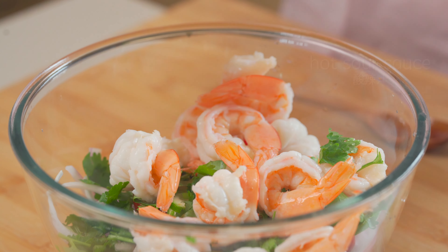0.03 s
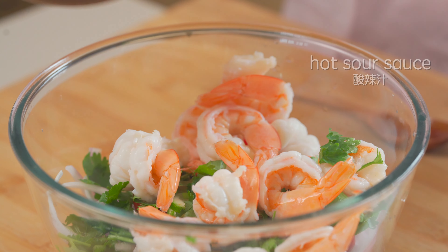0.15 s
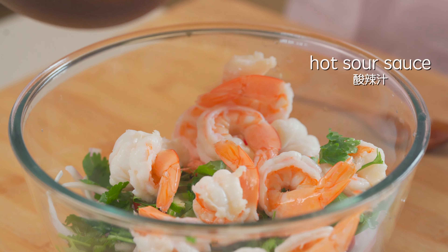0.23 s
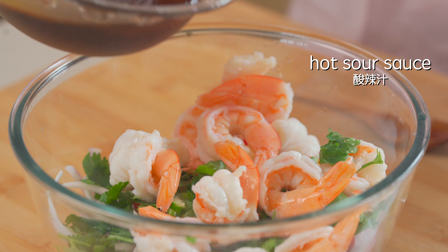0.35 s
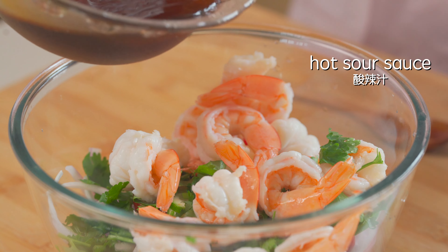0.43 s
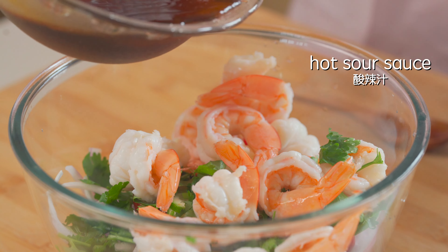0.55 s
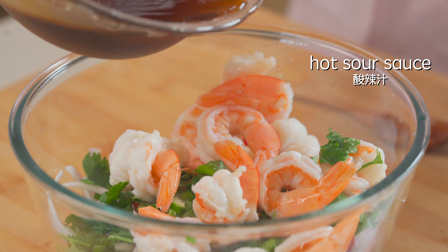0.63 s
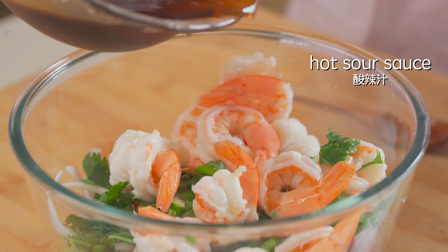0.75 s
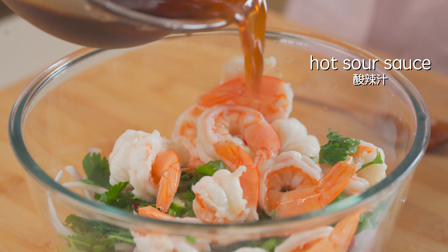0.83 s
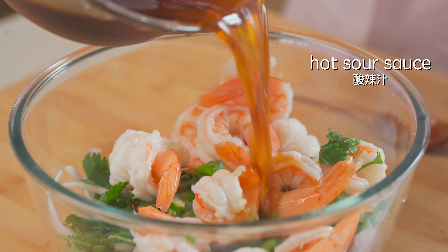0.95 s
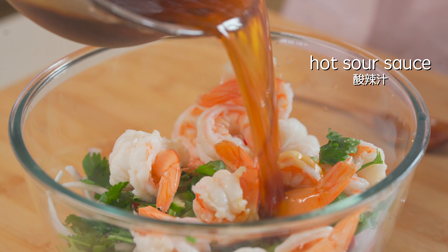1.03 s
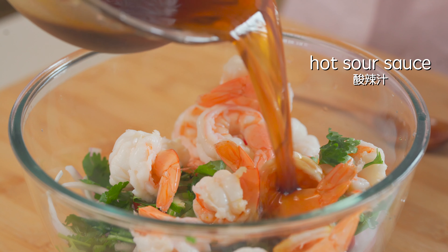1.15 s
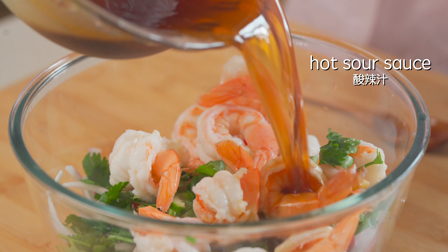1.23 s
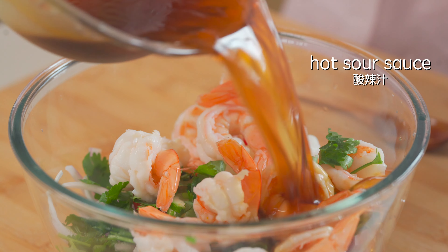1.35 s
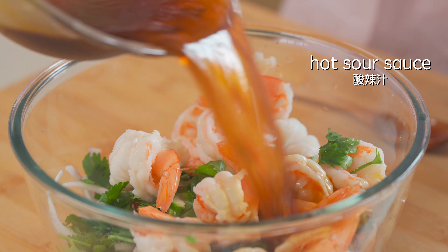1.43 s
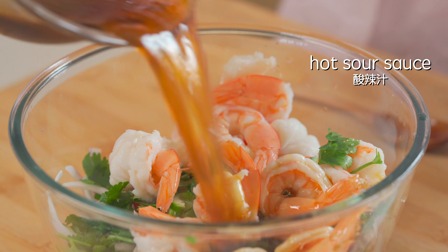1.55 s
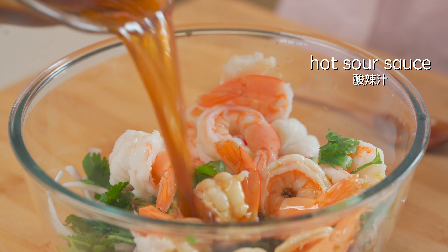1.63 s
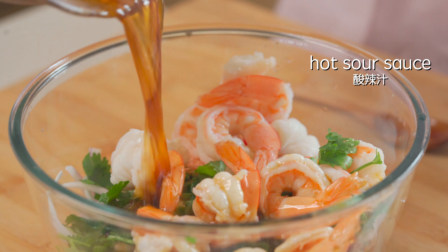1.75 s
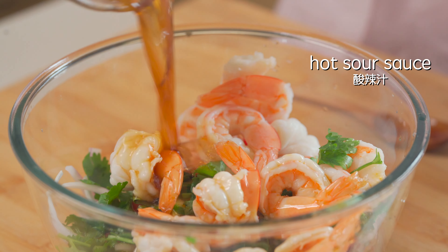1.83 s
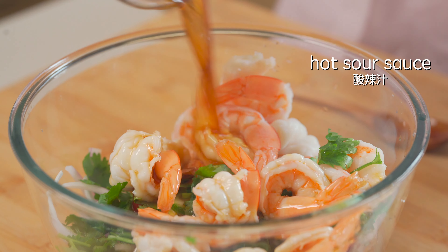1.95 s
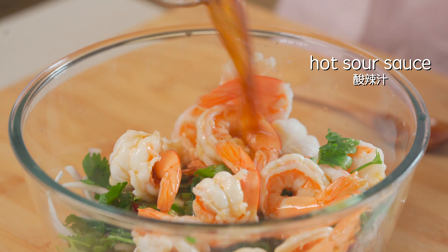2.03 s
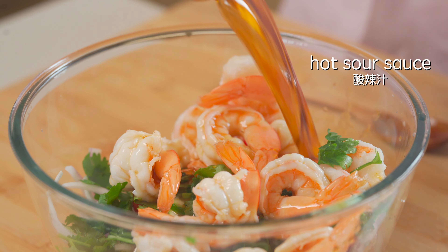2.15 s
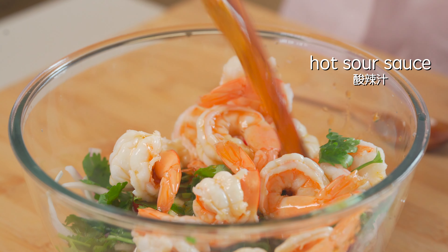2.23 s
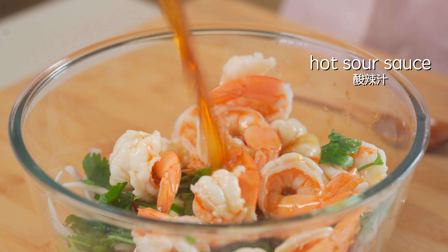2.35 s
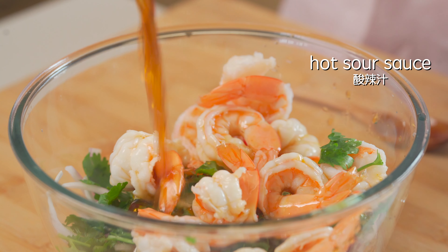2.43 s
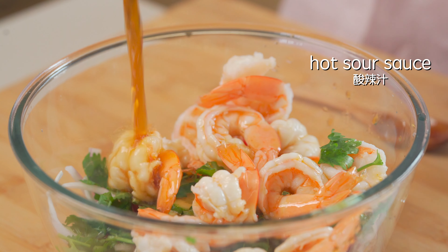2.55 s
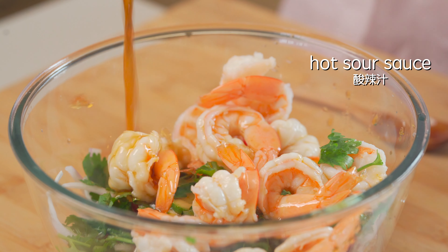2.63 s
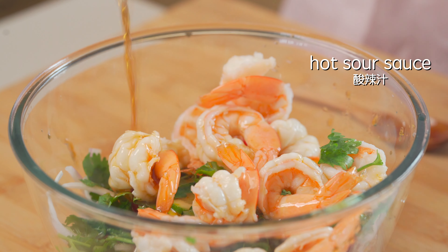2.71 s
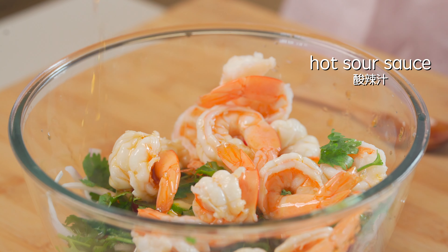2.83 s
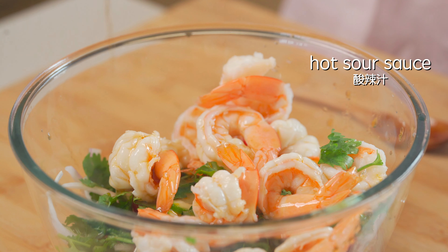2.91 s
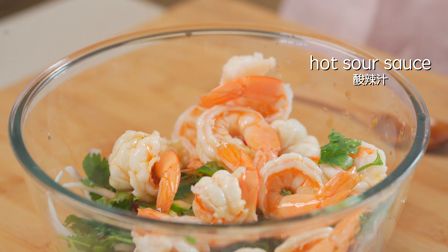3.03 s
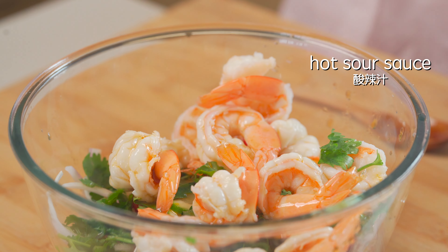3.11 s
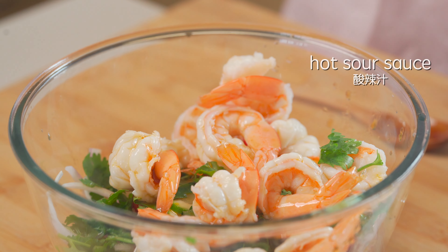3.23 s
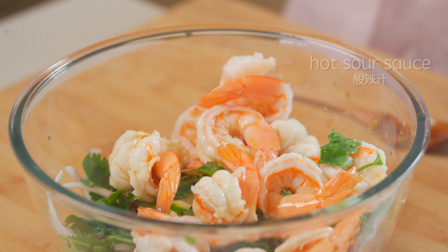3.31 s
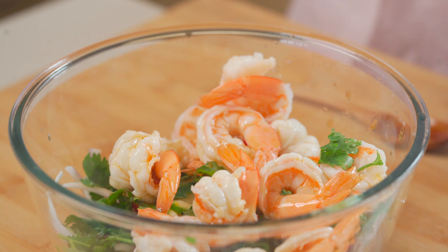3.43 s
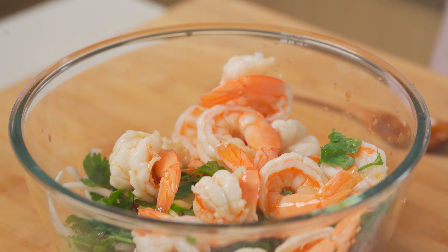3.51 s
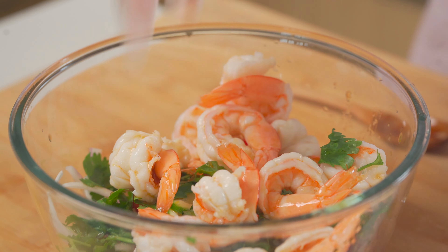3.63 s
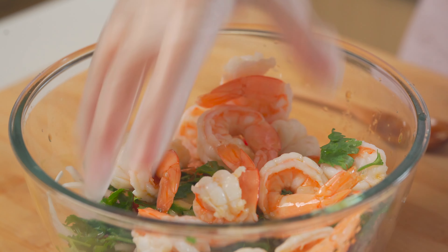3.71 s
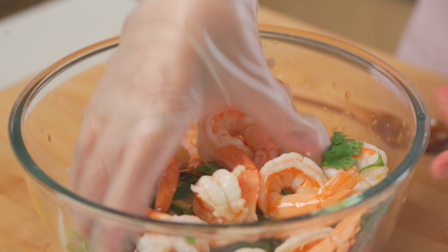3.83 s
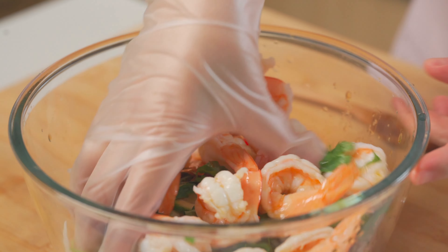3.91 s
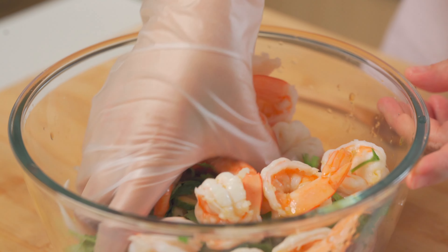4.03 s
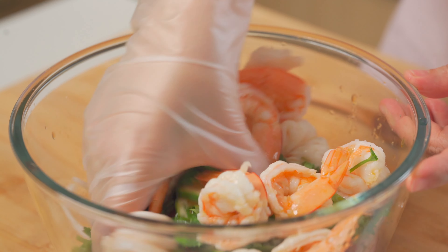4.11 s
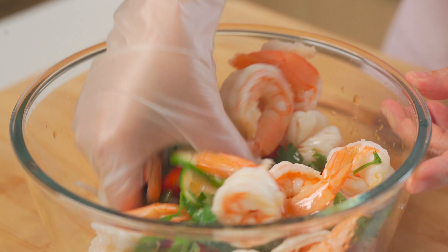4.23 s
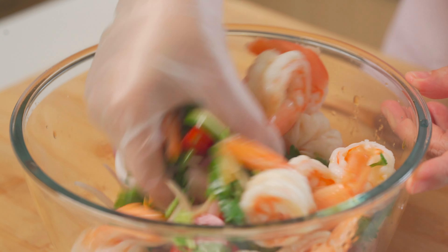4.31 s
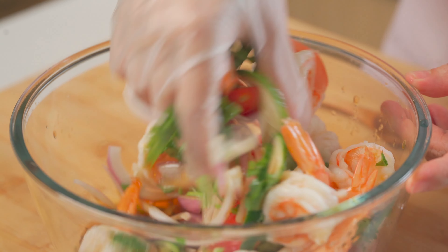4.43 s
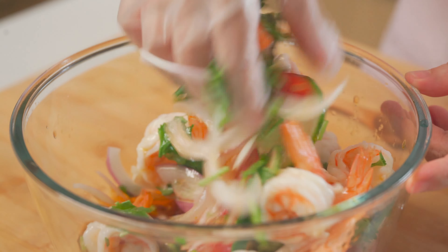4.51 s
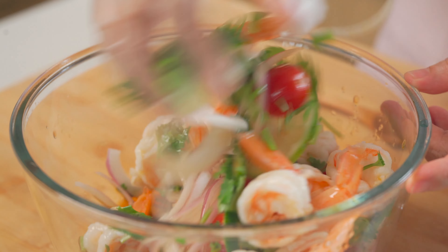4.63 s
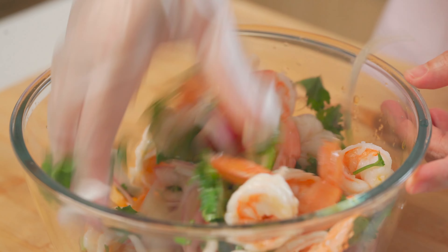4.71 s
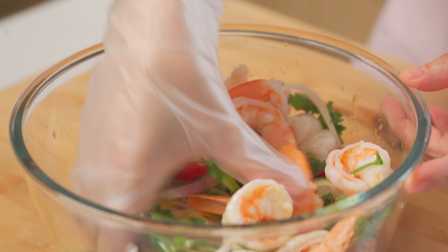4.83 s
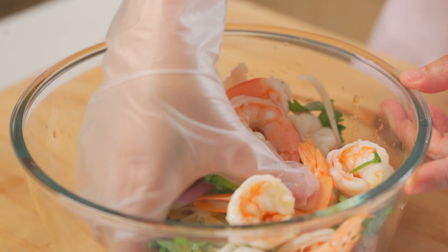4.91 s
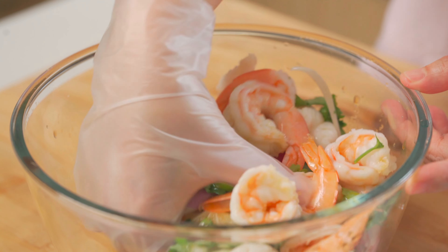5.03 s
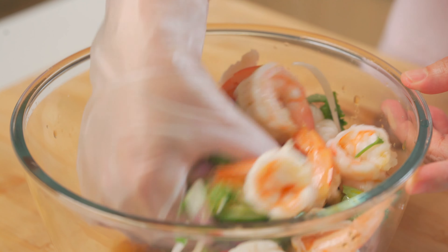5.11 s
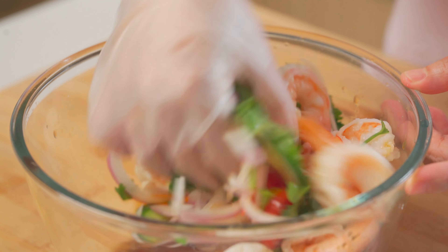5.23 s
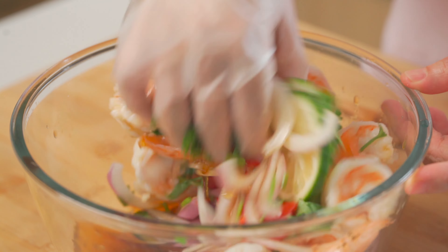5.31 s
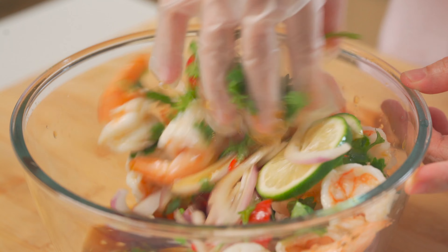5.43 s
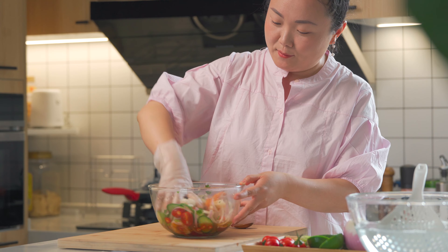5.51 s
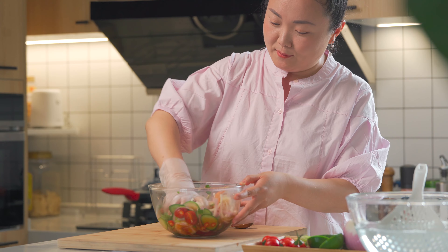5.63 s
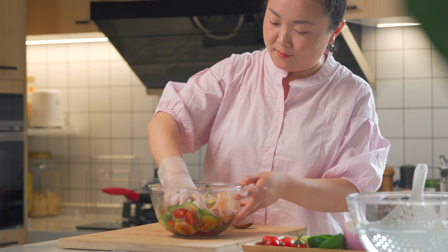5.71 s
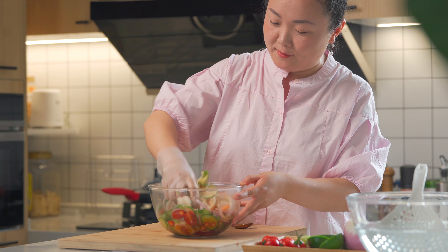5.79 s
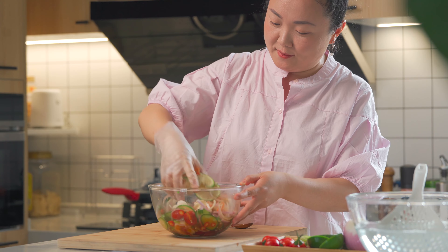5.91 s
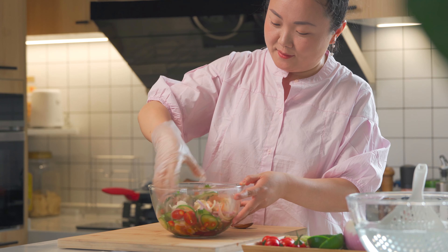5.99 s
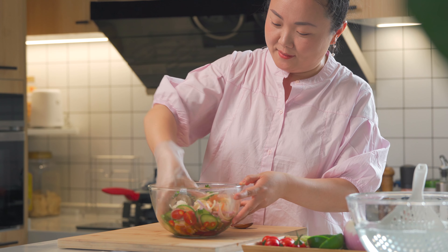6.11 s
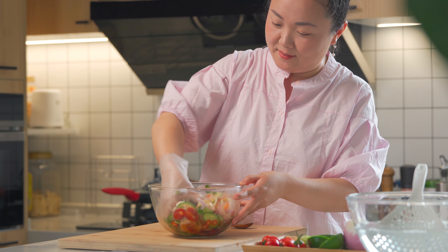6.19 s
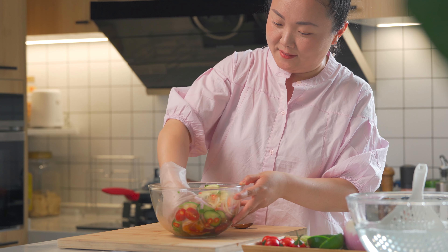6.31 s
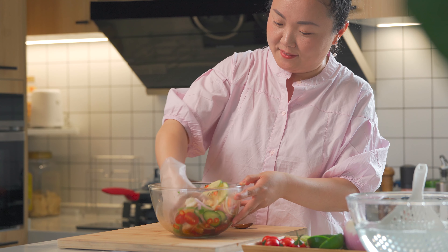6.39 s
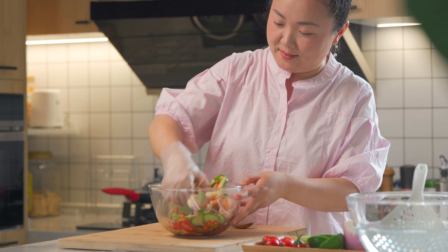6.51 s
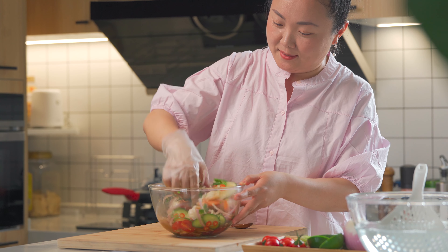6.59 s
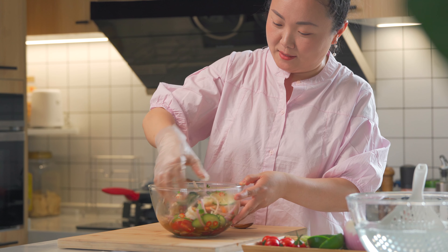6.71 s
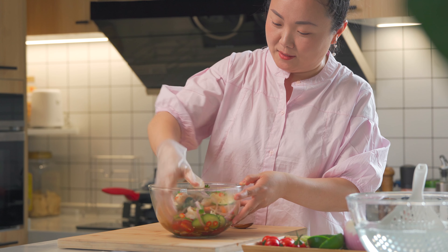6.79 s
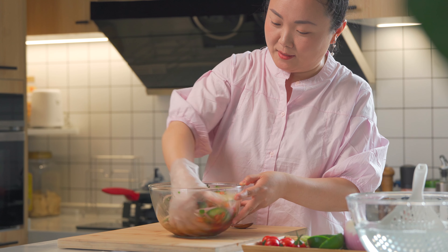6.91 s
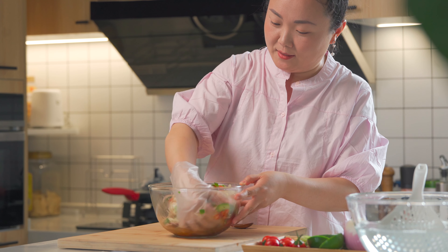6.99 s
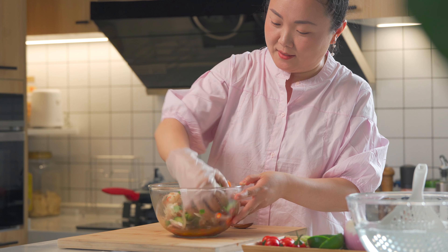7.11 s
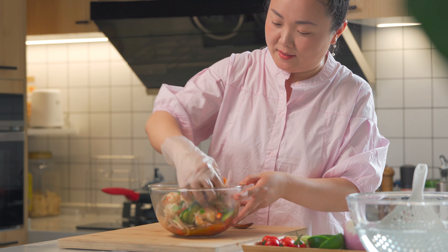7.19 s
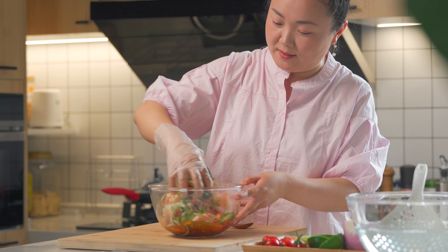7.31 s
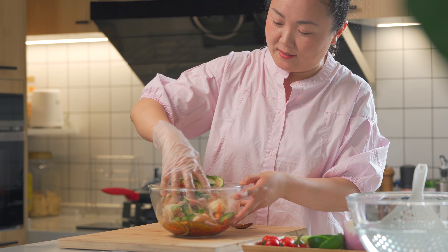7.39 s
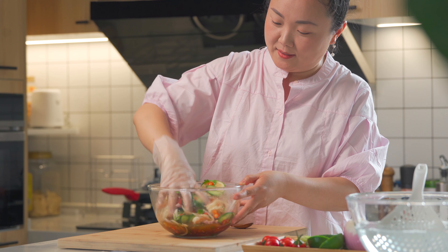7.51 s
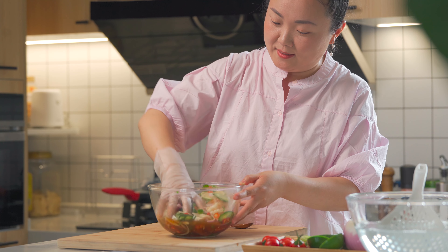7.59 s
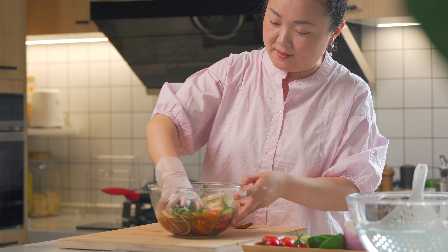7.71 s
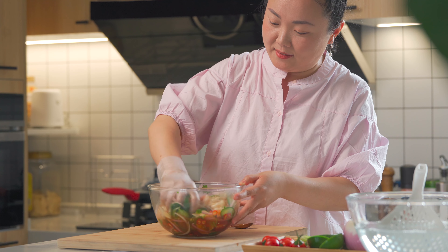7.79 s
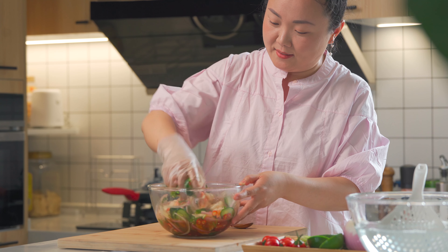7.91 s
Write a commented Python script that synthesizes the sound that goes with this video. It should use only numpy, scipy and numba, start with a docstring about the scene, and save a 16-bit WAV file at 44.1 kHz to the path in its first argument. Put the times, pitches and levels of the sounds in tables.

```python
"""At a kitchen counter, sauce is poured over seafood and herbs in a glass bowl. Then a hand in a thin
plastic glove tosses the food, heard first close up, then from across the counter. Bubbles and drops
blip, wet films and the glove snap, and the air in the bowl colours the lower sounds. The rim rings
and the counter is bumped. A kitchen fan rumbles and hums over the microphone's hiss."""
import sys
import numpy as np
from scipy import signal
from scipy.fft import rfft, irfft
from scipy.io import wavfile
from scipy.ndimage import uniform_filter1d
from numba import njit

SR = 44100
rng = np.random.default_rng(int(sys.argv[2]) if len(sys.argv) > 2 else 0)


def store_wav(level_fs):
    """Save 16-bit WAV to argv[1]."""
    pcm = np.round(np.clip(np.atleast_2d(level_fs), -1, 1) * 32767)
    wavfile.write(sys.argv[1], SR, pcm.T.astype(np.int16))


N = 350595
TIME = np.arange(N) / SR
FAR_S = 5.65  # from here on we listen from across the counter
LOW_SPREAD_DB = 1.2  # low sounds stay near the middle


def pouring():
    """The sauce comes in spurts: large bubbles gurgle low, droplets spatter high."""
    # The flow of sauce. Each row: time in seconds, spatter strength in dB, gurgle strength in dB.
    flow = [(0.95, -67, -77), (1.06, -50, -64), (1.16, -46, -51.5), (1.33, -46, -39), (1.375, -53, -49.5),
            (1.41, -58, -42), (1.477, -51.5, -53.5), (1.56, -40, -34), (1.70, -42, -36), (1.78, -42, -43.5),
            (1.94, -43.5, -50), (2.19, -43.5, -46.5), (2.28, -36, -36.5), (2.42, -38, -40.5),
            (2.59, -40.5, -45.5), (2.69, -48.5, -53.5), (2.78, -38.5, -38), (2.96, -54.5, -46.5),
            (3.09, -57, -61), (3.31, -60, -62), (3.37, -65, -76)]
    # The biggest bubbles and drops. Each row: start in seconds, level in dB, pitch in Hz,
    # ring time in seconds.
    bubbles = [(1.0773, -25.5, 10800, 0.0032), (1.1484, -18.5, 6100, 0.0024), (1.1646, -23, 3200, 0.0091),
               (1.2724, -22.5, 6000, 0.0059), (1.318, -27, 3200, 0.0099), (1.3954, -23.5, 1295, 0.025),
               (1.4053, -22, 5230, 0.0038), (1.4123, -20.5, 11160, 0.0031), (1.5043, -19, 7100, 0.0074),
               (1.5375, -16, 6850, 0.0026), (1.549, -24, 3300, 0.0096), (1.609, -7, 3080, 0.009),
               (1.6508, -17, 2030, 0.0059), (1.5757, -20, 4640, 0.0031), (1.6478, -23, 4500, 0.0098),
               (1.6661, -24, 1900, 0.0099), (1.662, -21, 4600, 0.0064), (1.6859, -20.5, 6660, 0.013),
               (1.6946, -17.5, 2020, 0.016), (1.6965, -10, 11370, 0.0032), (1.7208, -11.5, 10000, 0.0032),
               (1.8002, -21, 5500, 0.012), (1.8654, -21, 4480, 0.011), (1.8875, -26.5, 3000, 0.015),
               (1.96, -20.5, 6500, 0.0033), (1.967, -6, 9300, 0.0021), (1.976, -15.5, 5100, 0.0035),
               (1.9809, -15, 7300, 0.0021), (1.9936, -16.5, 4800, 0.0035), (2.0562, -16, 9900, 0.0064),
               (2.0664, -20, 6820, 0.005), (2.098, -20.5, 9200, 0.0034), (2.1326, -16, 4400, 0.0015),
               (2.1328, -29, 2540, 0.013), (2.1622, -17.5, 6040, 0.0061), (2.219, -12, 3900, 0.0029),
               (2.284, -16, 2200, 0.0038), (2.313, -17, 5400, 0.005), (2.334, -20, 4170, 0.0044),
               (2.3398, -10.5, 9700, 0.0041), (2.3746, -20, 8150, 0.0042), (2.4049, -17.5, 6940, 0.0064),
               (2.4374, -16.5, 8870, 0.0036), (2.4598, -17.5, 7500, 0.0077), (2.4869, -14, 4970, 0.0029),
               (2.533, -24.5, 4870, 0.01), (2.5674, -27, 4250, 0.0094), (2.6181, -25, 3140, 0.0086),
               (2.6002, -22, 2820, 0.0087), (2.6305, -17.5, 7850, 0.0018), (2.7215, -26.5, 2700, 0.023),
               (2.75, -10.5, 3100, 0.0051), (2.7718, -20.5, 9650, 0.008), (2.775, -24, 3370, 0.014),
               (2.8283, -14, 2110, 0.0012), (2.8807, -18.5, 11090, 0.0017), (2.9186, -25.5, 3540, 0.01),
               (2.9327, -23.5, 1580, 0.0065), (2.9608, -23.5, 7900, 0.0029), (2.9801, -28, 10500, 0.004),
               (2.961, -26.5, 1820, 0.0097), (3.0148, -20, 9100, 0.0017), (3.0902, -23.5, 4650, 0.00058),
               (3.1461, -28, 4570, 0.0039), (3.2673, -30, 8360, 0.0033), (3.4062, -30.5, 10700, 0.0023)]
    levels = flurries(curve(flow), bubbles, high_low_db=(-7.5, -15.5), t60=.1, rise_s=0.022)
    spatter_db, gurgle_db = levels + 2.0 * wander(34.28)
    gurgle = swarm(gurgle_db, count=6000, hz=2292, octaves=0.564, cycles=20.4,
                   scatter_db=2.7, spread_db=LOW_SPREAD_DB, glide=0.13, rough=0.32)
    spatter = swarm(spatter_db, count=16000, hz=7740, octaves=0.624, cycles=27,
                    scatter_db=4.0, spread_db=3.5, glide=0.19, rough=0.37)
    plops = listed_blips(bubbles, spread_db=0.5, glide=0.089, rise=0.037, rough=0.074)
    return plops + bowl_air(gurgle, direct_db=-47.5) + spatter


def tossing():
    """Glove and leaves crackle in short, high blips; sauce squelches in longer, low ones."""
    # The hand's strokes. Each row: time in seconds, crackle strength in dB, squelch strength in dB.
    strokes = [(3.55, -70, -76), (3.6, -54.5, -56), (3.823, -53.5, -50.5), (3.86, -41.5, -43.5),
               (3.95, -42, -47.5), (4.18, -37, -41), (4.33, -41, -36.5), (4.43, -51, -50),
               (4.61, -37.5, -52.5), (4.7, -51, -53), (4.75, -51, -58), (4.81, -39.5, -50.5),
               (4.985, -37, -38), (5.09, -45, -42.5), (5.21, -37.5, -38), (5.32, -42, -52),
               (5.42, -40.5, -45.5), (5.51, -48.5, -55), (5.62, -46.5, -47), (5.85, -48.5, -50),
               (6.07, -57.5, -63), (6.32, -50.5, -47), (6.45, -55, -54.5), (6.74, -52, -62.5),
               (7.14, -51.5, -51.5), (7.2, -54.5, -55), (7.5, -54, -62), (7.6, -51, -52), (7.63, -54, -42),
               (7.75, -50.5, -51), (7.95, -45.5, -46)]
    # The loudest snaps of glove and wet film, and suction pops. Each row: start in seconds,
    # level in dB, pitch in Hz, ring time in seconds.
    snaps = [(3.5924, -25.5, 4800, 0.00069), (3.646, -25, 6500, 0.0017), (3.6868, -20, 7260, 0.0004),
             (3.7067, -21, 5640, 0.00036), (3.7576, -17.5, 10100, 0.003), (3.8473, -9.5, 9000, 0.0021),
             (3.86, -3.5, 8400, 0.00084), (3.9, -19, 8100, 0.0019), (3.9444, -16, 10600, 0.0048),
             (3.995, -19, 8300, 0.0085), (4.0546, -14.5, 4650, 0.0078), (4.0712, -7.5, 11600, 0.00081),
             (4.0702, -18, 1420, 0.0064), (4.1126, -17, 5340, 0.0018), (4.1486, -16, 7500, 0.0016),
             (4.166, -12, 2500, 0.0014), (4.1934, -10, 2620, 0.0028), (4.2451, -24, 1450, 0.0049),
             (4.2454, -18, 7150, 0.0038), (4.2733, -17, 8000, 0.0046), (4.2997, -15.5, 10200, 0.006),
             (4.326, -0.5, 1810, 0.0057), (4.3264, -12.5, 4320, 0.0016), (4.3642, -9, 7060, 0.0013),
             (4.398, -17, 9700, 0.0031), (4.4267, -24, 7850, 0.0075), (4.4492, -16, 6500, 0.0023),
             (4.4773, -16, 8800, 0.0014), (4.5363, -12.5, 6240, 0.0028), (4.594, -6.5, 7240, 0.0013),
             (4.6012, -18, 7200, 0.0051), (4.6483, -19, 6700, 0.0056), (4.6641, -15.5, 6300, 0.0039),
             (4.7218, -1.5, 8100, 0.0014), (4.7884, -19.5, 3070, 0.0071), (4.7887, -13, 8050, 0.0039),
             (4.8025, -20, 6400, 0.0034), (4.8585, -20, 3600, 0.008), (4.8595, -8.5, 6500, 0.0014),
             (4.9112, -16, 9150, 0.00087), (4.9613, -16, 8700, 0.0064), (4.9922, -20, 7360, 0.009),
             (5.0543, -4.5, 6060, 0.00065), (5.1221, -14, 5440, 0.0019), (5.1335, -15, 7560, 0.0023),
             (5.167, -23, 2900, 0.01), (5.1952, -18, 6000, 0.013), (5.2709, -23, 5700, 0.00091),
             (5.3038, -18, 8950, 0.00098), (5.355, -13.5, 7040, 0.0047), (5.358, -9, 6530, 0.0012),
             (5.3812, -12, 5930, 0.0011), (5.398, -21, 5230, 0.013), (5.5355, -15.5, 9700, 0.0028),
             (5.572, -18.5, 1740, 0.0014), (5.571, -14.5, 7900, 0.0048), (5.9319, -16, 8400, 0.0016),
             (5.9744, -18.5, 8400, 0.0013), (6.136, -23, 8150, 0.001), (6.436, -27.5, 1750, 0.0079),
             (6.6079, -24.5, 11600, 0.0019), (6.7514, -20, 10900, 0.00093), (6.7654, -23.5, 5030, 0.0023),
             (6.881, -23.5, 5800, 0.0014), (6.9032, -21, 6570, 0.0035), (7.015, -21, 6700, 0.001),
             (7.064, -35, 3100, 0.013), (7.137, -26, 5960, 0.002), (7.14, -34, 2110, 0.034),
             (7.343, -35, 2280, 0.03), (7.3524, -31, 5660, 0.0072), (7.5534, -23, 6820, 0.00083),
             (7.6115, -20, 1340, 0.012), (7.6149, -26, 3480, 0.008), (7.8113, -27, 10510, 0.0014),
             (7.8729, -30.5, 1840, 0.026), (7.9039, -26, 6800, 0.0046)]
    levels = flurries(curve(strokes), snaps, high_low_db=(-11, -12), t60=0.12, rise_s=0.019)
    crackle_db, squelch_db = levels + 2.0 * wander(45)
    squelch = swarm(squelch_db, count=8000, hz=1900, octaves=0.683, cycles=6.2,
                    scatter_db=1.0, spread_db=LOW_SPREAD_DB, glide=0.054, rough=0.14)
    crackle = swarm(crackle_db, count=16000, hz=7620, octaves=0.54, cycles=7.1,
                    scatter_db=4.0, spread_db=1.7, glide=0.046, rough=0.44)
    pops = listed_blips(snaps, spread_db=1.1, glide=0.075, rise=0.062, rough=0.43)
    return pops + ticks(snaps) + bowl_air(squelch, direct_db=-9) + slaps() + crackle


def ticks(snaps, hz=10300, t60=0.001, gain_db=-4.5):
    """Every snap opens with a tiny bright tick, stronger when the snap is higher."""
    rows = [(s, db + gain_db + 9 * np.log2(pitch / hz), hz, t60) for s, db, pitch, _ in snaps]
    return listed_blips(rows, spread_db=2.0, glide=0., rise=0.028, rough=0.06)


def slaps():
    """Wet food lands with a splat that dies away as the heap settles."""
    # Falling handfuls. Each row: start in seconds, level in dB, fade time in seconds.
    landings = [(4.325, -32, 0.16), (6.433, -62, 0.081), (7.612, -31.5, 0.057), (7.859, -43.5, 0.18)]
    loudness = sum(undb(db - 60 * np.maximum(TIME - s, 0) / t60) * (TIME >= s) for s, db, t60 in landings)
    mid_range = signal.butter(4, [450, 4200], "band", fs=SR, output="sos")
    return loudness * level(signal.sosfilt(mid_range, rng.standard_normal(N)), 0)


def flurries(base_db, events, high_low_db, t60, rise_s, split_hz=3600):
    """High and low swarm levels in dB: small blips crowd around each big one of like pitch."""
    kicks = np.zeros((2, N))
    for s, db, hz, ring_s in events:
        row = int(hz < split_hz)
        kicks[row, int(s * SR)] += undb(db + high_low_db[row]) ** 2 * ring_s / t60

    def fade(x, seconds):
        return signal.lfilter([1], [1, -undb(-120 / (seconds * SR))], x)

    build_up = fade(kicks[:, ::-1], rise_s)[:, ::-1]
    return 10 * np.log10(undb(base_db) ** 2 + np.maximum(fade(kicks, t60), build_up))


def swarm(db, count, hz, octaves, cycles, scatter_db, spread_db, glide, rough):
    """Random blips pitched around hz, many small and few large; their joint level follows db."""
    start_s, chance = rng.random((count, 2)).T * [[N / SR], [1]]
    detune, length, side = rng.standard_normal((count, 3)).T
    pitch = np.clip(hz * 2 ** (octaves * detune), 300, 16000)
    t60 = cycles * 2 ** (.5 * length) / pitch
    unevenness = np.where(start_s > FAR_S, 0.41, 1)  # from afar, single blips stand out less
    size_db = -scatter_db * unevenness * np.log(np.maximum(chance, .01))
    cloud = blips(start_s, size_db, pitch, t60, spread_db * side, glide, rise=0.022, rough=rough)
    power = uniform_filter1d(np.mean(cloud ** 2, 0), SR // 2)
    return undb(db) * cloud / np.sqrt(power)


def listed_blips(table, spread_db, glide, rise, rough):
    """One blip for each row, a little left or right of the middle."""
    return blips(*np.transpose(table), spread_db * rng.standard_normal(len(table)), glide, rise, rough)


def blips(start_s, db, hz, t60, pan_db, glide, rise, rough):
    """Fading tones in stereo. The ring time t60 is the seconds needed to fade by 60 dB."""
    out = np.zeros((2, N))
    t60 = np.clip(t60, 3e-4, 2)
    size = undb(db + np.minimum(60 / (4 * hz * t60), 12))  # make up for fading before the first crest
    start = (start_s * SR).astype(np.int64)
    wobble = rough * rng.standard_normal(N)
    add_rings(out, start, np.minimum(hz, .4 * SR), t60, size, glide, rise, undb(pan_db / 2), wobble)
    return out


@njit
def add_rings(out, start, hz, t60, size, glide, rise, pan, wobble):
    """Each tone swells over rise * t60; as it dies, its pitch wobbles and climbs by the share glide."""
    for k in range(len(start)):
        n = int(t60[k] * SR) + 2
        fall, swell = np.exp(-np.log(1000.) / n), np.exp(-1 / (rise * n + 1e-9))
        loudness, gap, phase = size[k], 1., 0.
        for i in range(min(n, out.shape[1] - start[k])):
            gap *= swell
            phase += 2 * np.pi * hz[k] * (1 + glide * i / n + wobble[start[k] + i]) / SR
            sample = loudness * (1 - gap) * np.sin(phase)
            out[0, start[k] + i] += sample * pan[k]
            out[1, start[k] + i] += sample / pan[k]
            loudness *= fall


def bowl_air(x, direct_db):
    """The air in the bowl favours a few pitches, each stronger or weaker as the heap shifts."""
    # The air's resonances. Each row: pitch in Hz, width in Hz, average gain in dB.
    resonances = [(760, 200, -9), (1220, 300, -2), (1850, 550, -3), (3250, 800, 0)]
    coloured = sum(undb(db + 1.96 * wander(9.0)) * band(x, hz, width) for hz, width, db in resonances)
    return undb(direct_db) * x + coloured


def bowl_walls(food, spots=8):
    """The action hops from spot to spot in the bowl, and each spot has its own quick echoes."""
    spot = np.repeat(rng.integers(0, spots, N // 400 + 1), 400)[:N]
    return sum(echoes(food * (spot == k), t60=0.039, db=-7.5, dull_hz=13000, apart_hz=6500)
               for k in range(spots))


def rim(held_from_s=4.87, choke_t60=.3, nudge_t60=0.16):
    """The tapped glass rings until a hand chokes it; soft pushes wake only its lowest tone."""
    # The glass's tones. Each row: pitch in Hz, gain in dB, ring time in seconds.
    glass = [(420.5, -13.5, .8), (1110, -16, 0.52), (2037, -3.5, 1), (3187, -4, 0.49), (4580, -12, 0.26),
             (6400, -20, .2), (7250, -20, .12), (8400, -20, .1)]
    # Taps on the rim. Each row: start in seconds, strength in dB.
    taps = [(4.733, -47.5), (4.776, -39), (4.803, -31)]
    # Soft pushes. Each row: start in seconds, strength in dB.
    nudges = [(3.862, -41), (5.011, -45), (6.9, -41.5)]
    choke = undb(-60 * np.maximum(TIME - held_from_s, 0) / choke_t60)
    return struck(taps, glass) * choke + struck(nudges, [(glass[0][0], 0, nudge_t60)])


def counter_knocks():
    """Something bumps the counter, which answers with a low thud."""
    # The bumps. Each row: start in seconds, strength in dB.
    knocks = [(.058, -52), (.155, -37), (6.14, -49), (6.9, -52)]
    # The counter's tones. Each row: pitch in Hz, gain in dB, ring time in seconds.
    counter = [(140.3, 4.5, 0.43), (300, 11, 0.031), (433, -23, 0.056)]
    return struck(knocks, counter)


def struck(blows, tones):
    """Every blow rings all the given tones of an object."""
    rows = np.array([(s, db + gain, hz, t60) for s, db in blows for hz, gain, t60 in tones])
    return blips(*rows.T, pan_db=np.zeros(len(rows)), glide=0., rise=0.0029, rough=0.)


def echoes(x, t60, db, dull_hz, apart_hz):
    """A dense tail of echoes, duller than the source; left and right differ above apart_hz."""
    t = np.arange(int(t60 * SR)) / SR
    mid, side = rng.standard_normal((2, SR))[:, :len(t)] * undb(-60 * t / t60) * (t > .0007)
    side = signal.lfilter(*signal.butter(2, apart_hz, "high", fs=SR), side)
    tail = signal.lfilter(*signal.butter(1, dull_hz, fs=SR), mid + side * np.array([[1], [-1]]))
    tail = tail * undb(db) / np.sqrt(np.sum(mid ** 2))
    return signal.oaconvolve(x.mean(0, keepdims=True), tail, axes=1)[:, :N]


def fan(hum_hz=213.2, far_hum_loss=0.58):
    """The fan rumbles much alike in both ears; its motor's hum is weaker across the counter."""
    # The colour of the rumble. Each row: frequency in Hz, relative strength in dB.
    spectrum = [(15, 5.5), (25, -3), (60, -10.5), (120, -20), (180, -16.5), (200, -18), (214, -9.5),
                (228, -21), (245, -13), (330, -23), (480, -23.5), (800, -26.5), (1200, -32.5),
                (1700, -42.5), (3000, -52)]
    points_hz, points_db = np.transpose(spectrum)
    hz = np.fft.rfftfreq(N, 1 / SR) + 1
    shape = undb(np.interp(np.log(hz), np.log(points_hz), points_db, left=-40))
    mid, side = irfft(rfft(rng.standard_normal((2, N))) * shape, N)
    side = signal.lfilter(*signal.butter(1, 35, "high", fs=SR), side)
    rumble = level(mid + undb(-10) * side * np.array([[1], [-1]]), db=-41)
    hum = level(np.sin(2 * np.pi * hum_hz * TIME + 1.36 * wander(5.2)), db=-54)
    return rumble + hum * (1 - far_hum_loss * (TIME > FAR_S))


def hiss():
    """A thin whine and the microphone's hiss, separate in each ear."""
    whine = level(band(rng.standard_normal((2, N)), hz=5420, width=200), db=-74)
    return whine + level(rng.standard_normal((2, N)), db=-54.5)


def undb(db):
    """Turn decibels into a volume factor."""
    return 10 ** (np.asarray(db) / 20)


def level(x, db):
    """Scale x to an average (rms) level of db."""
    return x * undb(db) / np.sqrt(np.mean(x ** 2))


def curve(table):
    """Join a table's dB points with lines over time; silent outside them."""
    seconds, *columns = np.transpose(table)
    return np.array([np.interp(TIME, seconds, db, left=-200, right=-200) for db in columns])


def band(x, hz, width):
    """Keep the part of x near hz."""
    return signal.lfilter(*signal.iirpeak(min(hz, .45 * SR), hz / width, fs=SR), x)


def wander(rate):
    """Slide to a new random value, mostly within -1 to 1, rate times a second."""
    step = int(SR / rate)
    return 0.93 * uniform_filter1d(np.repeat(rng.standard_normal(N // 100), step), step)[:N]


def scene():
    """Mix food, bowl and counter with their echoes, the fan and the hiss."""
    low_cut = signal.butter(2, 700, "high", fs=SR, output="sos")  # tiny things give off little bass
    food = signal.sosfilt(low_cut, pouring() + tossing())
    direct = food + rim() + counter_knocks()
    far_boost_db = 10.5 * (TIME > FAR_S)  # from afar we hear more of the room
    room = echoes(direct * undb(far_boost_db), t60=0.32, db=-12.5, dull_hz=5000, apart_hz=2920)
    return direct + bowl_walls(food) + room + fan() + hiss()


def record(dry):
    """The microphone dulls the highest treble a little; then the very top is cut steeply."""
    soft = signal.lfilter(*signal.butter(1, 16100, fs=SR), dry)
    return signal.sosfilt(signal.ellip(8, .2, 70, 15650, fs=SR, output="sos"), soft)


dry = scene()
out = record(dry)
store_wav(out)
```